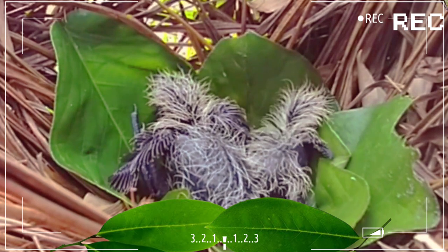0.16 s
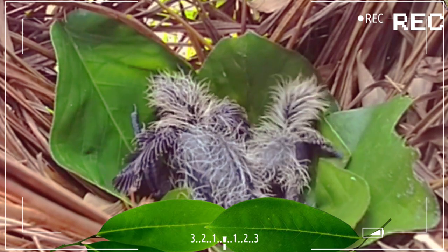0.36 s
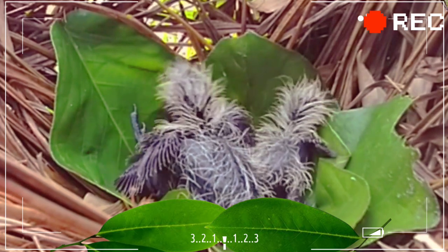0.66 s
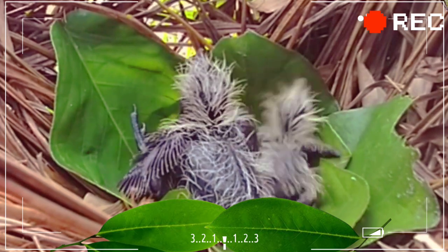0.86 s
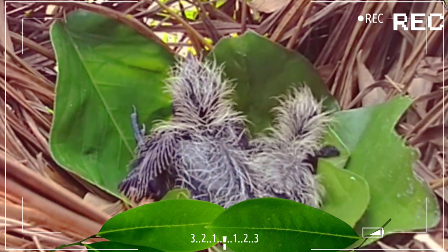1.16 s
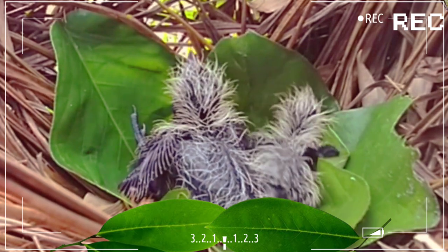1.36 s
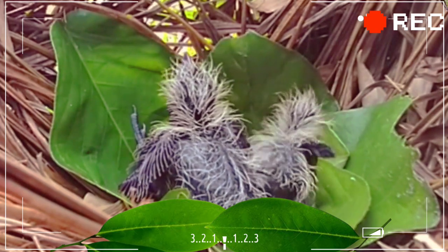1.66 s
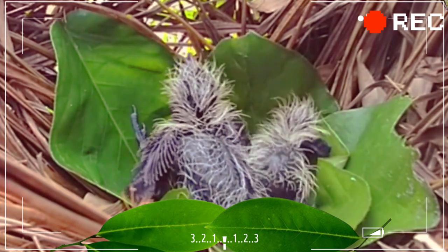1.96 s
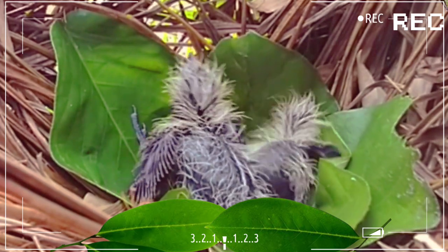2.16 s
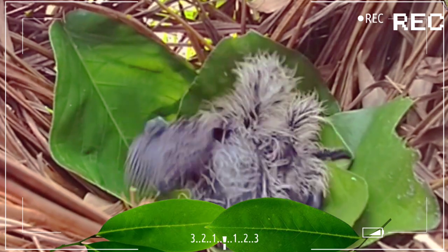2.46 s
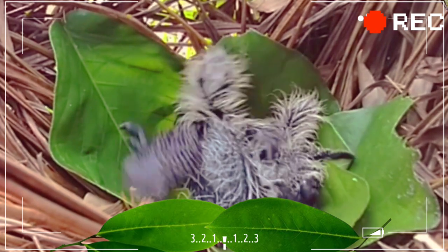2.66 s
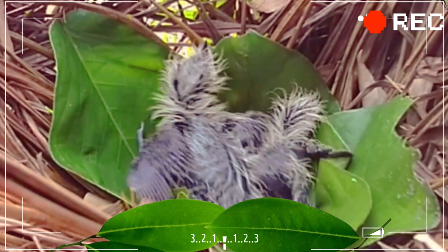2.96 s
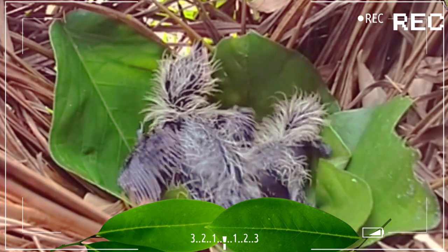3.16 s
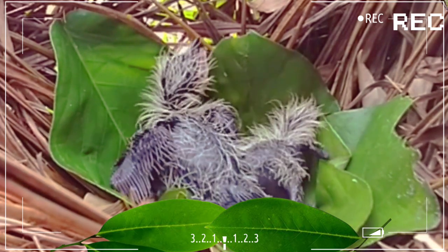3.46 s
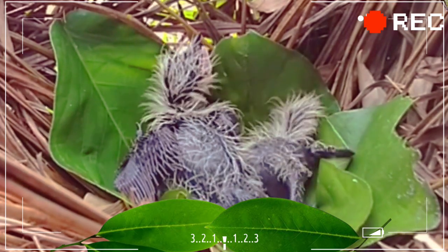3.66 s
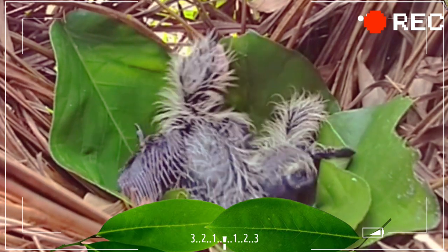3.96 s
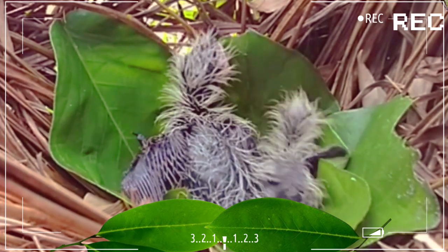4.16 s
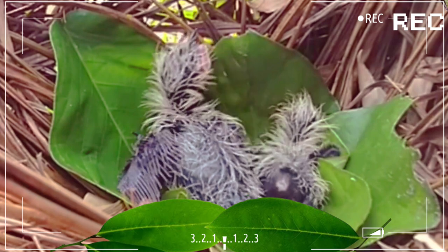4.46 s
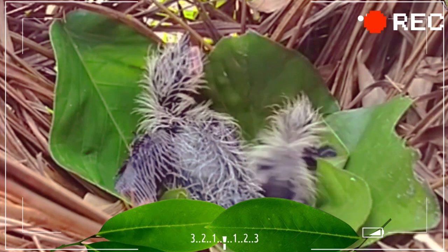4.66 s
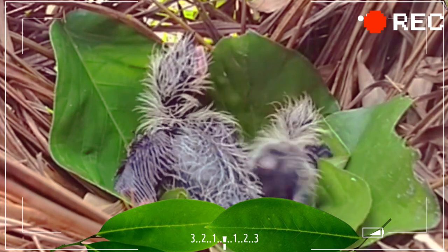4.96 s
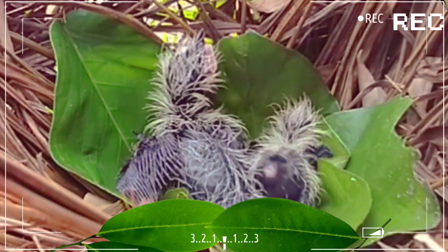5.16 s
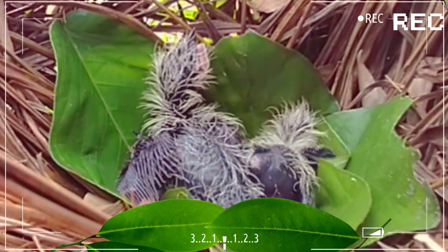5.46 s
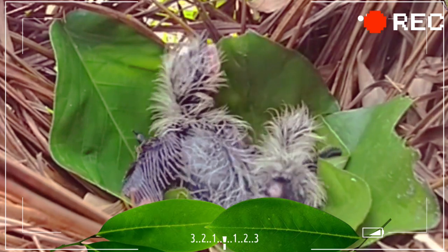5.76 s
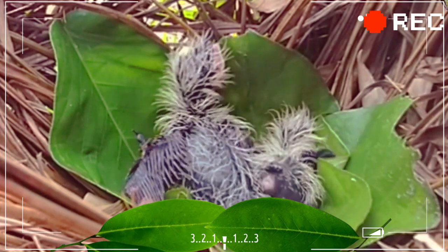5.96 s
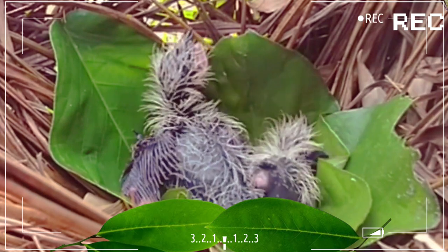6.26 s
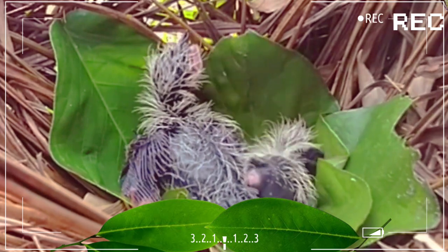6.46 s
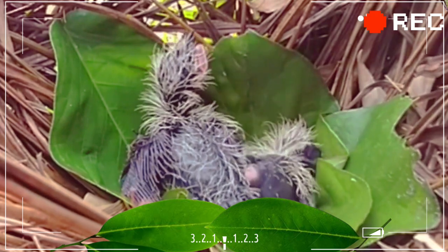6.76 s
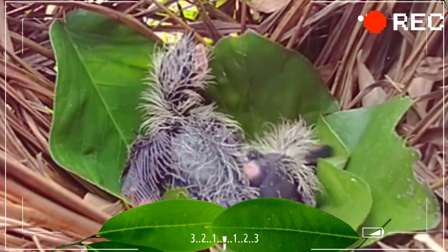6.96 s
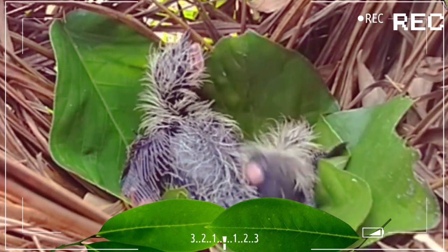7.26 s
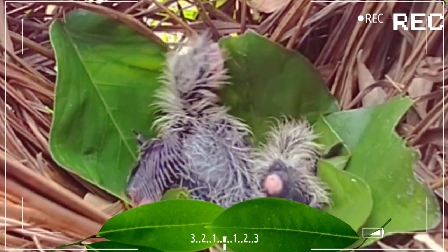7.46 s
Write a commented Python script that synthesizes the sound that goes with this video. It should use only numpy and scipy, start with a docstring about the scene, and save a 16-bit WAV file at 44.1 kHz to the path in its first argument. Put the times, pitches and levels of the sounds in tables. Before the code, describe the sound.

Outdoors, close to a nest among leaves. From 0 to 0.5 s a bird whistles a nearly pure tone around 2 kHz, with a quick warble dipping in pitch. Behind it lie faint airy hiss, low rumble, a thin high insect drone with a few long chirps, and soft gliding notes of far birds. Until 2.7 s it is mostly quiet: light rubbing, high crackle and small dry taps on leaves, busier around 2.2 to 2.6 s. At 2.7 s a soft begging rasp begins, then harsh chopped hisses with a high squeal repeat over four times a second, some followed by tiny falling peeps. A low hum swells around 3 to 5 s. A second warbled whistle sounds from about 4.1 to 4.8 s. After 5.8 s the rasps grow longer, brighter and stronger, with sharp ticks, rubbing and a strong crackle near 6.7 s, continuing to the end at about 7.6 s.

```python
"""Nestlings beg close by in a nest of leaves outdoors: loose flaps chop their breath
into puffs that ring throat and gape, over four rasps a second, with growing effort overall.
A bird whistles two nearly pure tones, each with a warble; some rasps get a breathy peep.
Soft rubbing and a fine high crackle swell, and noise bursts tap the leaves. Behind: insects as
narrow noise, gliding notes of far birds, shaped noise for hiss and rumble, and a wavering low hum."""
import sys
import numpy as np
from scipy import signal
from scipy.fft import rfft, irfft, next_fast_len
from scipy.io import wavfile
from scipy.ndimage import uniform_filter1d, map_coordinates

SR = 44100
rng = np.random.default_rng(int(sys.argv[2]) if len(sys.argv) > 2 else 0)


def file_out(sig):
    """Save sig as 16-bit WAV at sys.argv[1]."""
    # one column per channel
    cols = np.atleast_2d(sig).T
    # limit, then scale
    lim = np.clip(cols, -1, 1)
    pcm = np.round(lim * 32767).astype(np.int16)
    wavfile.write(sys.argv[1], SR, pcm)


N = 336042
TIME, BINS = np.arange(N) / SR, np.fft.rfftfreq(N, 1 / SR)


def amp(db):
    """Decibels to gain."""
    return 10 ** (np.asarray(db) / 20)


def unit(x):
    """Scales to rms 1."""
    return x / np.sqrt(np.mean(x ** 2) + 1e-20)


def follow(rows, t):
    """The columns of a curve at times t."""
    s, *columns = np.transpose(rows)
    return [np.interp(t, s, c) for c in columns]


def add(mix, s, sound):
    """Mixes a sound in at s seconds."""
    part = mix[max(round(s * SR), 0):][:len(sound)]
    part += sound[:len(part)]


def colour(x, points):
    """Weights the spectrum of x by a curve of (f/Hz, level/dB) points, then scales to rms 1."""
    hz, db = np.transpose(points)
    gain = amp(np.interp(np.log(BINS + 1), np.log(hz), db))
    return unit(irfft(rfft(x) * gain, N))


def bell(f, hz, width):
    """Gain of a steep resonance, halved at half its width to either side."""
    return 1 / (1 + (2 * (f - hz) / width) ** 2)


def wander(n, hz):
    """Slow random drift of rms about 1, up to about hz."""
    size = next_fast_len(n + SR // 4)
    f = np.fft.rfftfreq(size, 1 / SR)
    spectrum = rfft(rng.standard_normal(size)) * np.exp(-(f / hz) ** 2)
    return unit(irfft(spectrum, size))[:n]


def resonate(x, hz, width):
    """Rings x with a steep resonance that follows the curve hz, at rms 1."""
    turn = np.exp(2j * np.pi * np.cumsum(hz * np.ones(len(x))) / SR)
    r = np.exp(-np.pi * width / SR)
    # shift the pitch down to zero, filter with a double pole, shift back up
    ringing = signal.lfilter([1], [1, -2 * r, r * r], x / turn)
    return unit((turn * ringing).real)


# the two whistles, one curve each: t/s, f/Hz, level/dB (pitch and level before the warble)
WHISTLES = [
    [(0, 1994, -28), (.05, 1993, -25.5), (.13, 2032, -25), (.27, 2061, -24.5), (.33, 2048, -25),
     (.41, 2025, -27.5), (.48, 2019, -30.5), (.521, 2036, -30)],
    [(4.07, 2035, -45), (4.15, 1986, -35.5), (4.29, 2022, -32.5), (4.41, 2052, -24.5), (4.505, 2107, -26.5),
     (4.56, 2070, -25), (4.65, 2031, -23.5), (4.73, 2011, -25.5), (4.836, 2002, -29)],
]
# the warble in the middle of each whistle: deepest t/s, one dip t/s
WARBLES = [(.195, .177), (4.496, 4.473)]
# partials of the whistle: multiple of the pitch, level/dB, extra level/dB at full strain
PARTIALS = [(1, 0, -2), (2, -48, 0), (3, -33, 13), (4, -38, 5), (5, -40, 14)]


def whistle(tune, deepest_s, dip_s, warble_hz=16.84, depth_hz=152, rise_s=.075, fall_s=.14,
            dip_db_per_100_hz=8.0, lag_s=0.0055, release_s=0.015):
    """A nearly pure tone; each dip of the warble pulls down the pitch and, just after, the level."""
    t = np.arange(tune[0][0], tune[-1][0], 1 / SR)
    hz, level_db = follow(tune, t)
    # the warble builds quickly and dies away slowly
    side_s = np.where(t < deepest_s, rise_s, fall_s)
    depth = depth_hz * np.exp(-((t - deepest_s) / side_s) ** 2)
    dip, weak = (np.cos(np.pi * warble_hz * (t - dip_s - lag)) ** 2 for lag in (0, lag_s))
    pitch = hz - depth * dip ** 2 + 4 * wander(len(t), 63)
    phase = 2 * np.pi * np.cumsum(pitch) / SR
    db = level_db - dip_db_per_100_hz * depth / 100 * weak ** 5 + 1.2 * wander(len(t), 35)
    # the tone brightens as the bird pushes the pitch up
    strain = np.clip((pitch - 2000) / 50, -.5, 1)
    tone = sum(amp(d + extra * strain) * np.sin(round(k) * phase) for k, d, extra in PARTIALS)
    release = np.minimum((t[-1] - t) / release_s, 1)
    return t[0], np.sqrt(2) * amp(db) * tone * release


# far birds, one arched or gliding note each:
# start t/s, length/s, start f/Hz, middle f/Hz, end f/Hz, level/dB (before the flutter)
FAR_CALLS = [(0, 0.15, 640, 554, 500, -60), (0.129, 0.19, 840, 931, 760, -61),
             (0.298, 0.245, 560, 628, 574, -55), (0.515, 0.3, 1480, 2010, 2187, -59),
             (0.828, .5, 600, 619, 555, -62.5), (1.676, 0.16, 978, 1060, 1080, -63.5),
             (1.44, 0.106, 2560, 2420, 2340, -62), (2.5, .08, 2580, 2470, 2310, -58)]


def far_call(start, length, start_hz, middle_hz, end_hz, db, blur_hz=70, blur_db=-7, flutter_db=3.0):
    """A distant note on one arch of pitch, fluttering and blurred by the trees."""
    u = np.linspace(0, 1, int(length * SR))
    arch = np.polyfit([0, .5, 1], [start_hz, middle_hz, end_hz], 2)
    hz = np.polyval(arch, u)
    tone = np.sin(2 * np.pi * np.cumsum(hz) / SR)
    blur = amp(blur_db) * resonate(rng.standard_normal(len(u)), hz, blur_hz)
    level = amp(db + flutter_db * wander(len(u), 30))
    return start, level * (tone + blur) * signal.windows.tukey(len(u), .5)


def crackle(grains_per_s, spread_db, smooth):
    """Small snaps of uneven size over a soft hiss."""
    size = amp(spread_db * np.minimum(rng.exponential(1, N), 4))
    grains = (rng.random(N) < grains_per_s / SR) * size
    return unit(grains * rng.choice([-1, 1], N)) + smooth * rng.standard_normal(N)


# swells of soft rubbing and fine high hissing crackle:
# middle t/s, half length/s, rubbing level/dB (before rub_trim_db), crackle level/dB
SWELLS = [(0.054, 0.13, -58.5, -46.5), (0.252, 0.071, -54.5, -36.5), (.48, .08, -57, -45),
          (0.98, 0.069, -56.5, -52), (1.207, 0.043, -61, -55), (2.14, 0.11, -56, -48),
          (2.396, 0.083, -47.5, -43), (2.738, 0.16, -49.5, -51), (3.603, 0.69, -54.5, -44),
          (5.3, 0.66, -56.5, -49), (6.3, 0.38, -48, -51), (6.67, 0.34, -40.5, -21),
          (7.2, 0.073, -42.5, -45), (7.58, 0.31, -43.5, -33)]
# tone of the soft rubbing: f/Hz, relative level/dB
RUB_COLOUR = [(60, -7), (150, 1.5), (400, 2.5), (750, 8), (1200, 6.5), (2300, 5.5), (3500, 0), (5000, -4),
              (6200, 6), (7500, -17), (9500, 1.5), (12200, -9)]
# tone of the fine high crackle: f/Hz, relative level/dB
FIZZ_COLOUR = [(4000, -65), (8000, -13.5), (10000, -17.5), (11500, -3), (12300, -7)]
# tone of the dull bumps: f/Hz, relative level/dB
BUMPS = [(30, -21), (80, -4.5), (140, -7), (280, -14.5), (500, -2), (1500, -50)]


def rub_and_fizz(resting_rub_db=-64.5, resting_fizz_db=-58, rub_trim_db=3, bump_db=-61):
    """Soft rubbing and a fine high hissing crackle swell together; strong rubbing adds dull bumps."""
    middle, half, rubs, fizzes = np.transpose(SWELLS)
    swelling = np.exp(-((TIME - middle[:, None]) / half[:, None]) ** 2)
    # overlapping swells add up as power
    force = np.sqrt(amp(resting_rub_db) ** 2 + amp(rubs) ** 2 @ swelling)
    rub = force * colour(crackle(1500, spread_db=3.0, smooth=0.76), RUB_COLOUR)
    fizz_level = np.sqrt(amp(resting_fizz_db) ** 2 + amp(fizzes) ** 2 @ swelling)
    fizz = fizz_level * colour(crackle(1300, spread_db=6.0, smooth=0.55), FIZZ_COLOUR)
    bumps = unit(force ** 2 * colour(crackle(40, spread_db=6, smooth=0.18), BUMPS))
    return amp(rub_trim_db) * rub + fizz + amp(bump_db) * bumps


# long pulses of one insect: start t/s, end t/s
CHIRPS = [(.28, .59), (.98, 1.23), (1.68, 1.98)]


def insects(drone_hz=6760, drone_width_hz=300, drone_db=-61,
            chirp_hz=9500, chirp_width_hz=280, chirp_db=-63):
    """Narrow bands of noise: one insect drones steadily, another chirps in long pulses."""
    pulses = sum(1. * ((TIME > a) & (TIME < b)) for a, b in CHIRPS)
    gate = uniform_filter1d(pulses, SR // 20)
    drone = resonate(rng.standard_normal(N), drone_hz, drone_width_hz)
    chirp = gate * resonate(rng.standard_normal(N), chirp_hz, chirp_width_hz)
    return amp(drone_db) * drone + amp(chirp_db) * chirp


# tone of the outdoor hiss: f/Hz, relative level/dB
AIR = [(59, -41), (100, 3), (206, 0.5), (263, 4), (335, -4), (521, 2.5), (916, -7), (2460, -11),
       (4410, -30), (5960, -34.5), (6590, -47), (7590, -30), (12300, 5.5), (16000, -24), (22000, -120)]
# swell of the low rumble: t/s, level/dB
RUMBLE = [(0, -48.5), (1.3, -56), (2.5, -51), (5.5, -50.5), (7, -48.5), (7.62, -47)]
# tone of the rumble: f/Hz, relative level/dB
RUMBLE_COLOUR = [(10, -0.5), (25, 6.5), (35, -7.5), (44, -1.5), (55, -2), (70, -4.5), (110, -13),
                 (200, -30), (500, -63)]
# swell of the low hum: t/s, level/dB (before hum_trim_db)
HUM = [(0, -67), (2.3, -65.5), (3.0, -52.5), (3.4, -47.5), (4.6, -47), (5.4, -52), (7.62, -52)]


def air(hiss_db=-53, hum_hz=44, hum_trim_db=-1):
    """Faint outdoor hiss and a low rumble of shaped noise, with a hum wavering in pitch and level."""
    rumble = amp(follow(RUMBLE, TIME)[0]) * colour(rng.standard_normal(N), RUMBLE_COLOUR)
    turns = np.cumsum(hum_hz + 2.7 * wander(N, 7.6)) / SR
    hum_db = follow(HUM, TIME)[0] + hum_trim_db + 1.1 * wander(N, 5.8)
    hum = amp(hum_db) * np.sqrt(2) * np.sin(2 * np.pi * turns)
    return hum + rumble + amp(hiss_db) * colour(rng.standard_normal(N), AIR)


# claws and wings tapping leaves:
# t/s, tick level/dB, knock level/dB (both before the trims), leaf pitch f/Hz
TAPS = [(0.171, -23.5, -32.5, 1400), (0.292, -29, -35, 1700), (0.411, -58, -35, 1400),
        (1.001, -45, -37, 1200), (1.099, -46, -40.5, 850), (1.113, -37, -52, 700), (1.334, -46, -35.5, 795),
        (1.452, -45, -39, 1310), (1.976, -30, -46, 900), (2.039, -31, -36, 2290),
        (2.181, -23.5, -23.5, 456), (2.273, -27.5, -55, 900), (2.437, -27, -21, 540),
        (2.574, -16, -35, 700), (2.595, -42, -32, 900), (2.611, -26, -24, 860), (4.084, -19, -43, 900),
        (4.17, -3.5, -35, 700), (4.995, -33, -48, 900), (6.189, -29, -49, 700), (6.205, -8.5, -31, 704),
        (6.387, -3.5, -47, 500), (6.455, -5, -43, 600), (6.55, -28, -29, 220), (6.686, -8, -42, 300),
        (6.858, -20, -31, 600), (6.881, -3.5, -30, 500), (6.887, -8, -32, 700), (7.18, -26, -24.5, 220),
        (7.363, -7, -27.5, 1500), (7.376, -10, -42, 900)]


def tap(s, tick_db, knock_db, hz, tick_s=0.0039, knock_s=0.0065, after_db=-20, after_s=0.017,
        tick_trim_db=-3, knock_trim_db=-6, width_per_hz=2.1,
        crack_hz=3600, crack_width_hz=5000, crack_s=0.003, crack_trim_db=-11.0):
    """A dry tick with a little crackle after it, and a short dull knock of the leaf with its crack."""
    t = np.arange(SR // 12) / SR
    snap = unit(signal.lfilter([1, -1.2, .45], [1], rng.standard_normal(len(t))))
    tick = snap * (np.exp(-t / tick_s) + amp(after_db) * np.exp(-t / after_s))
    knock = resonate(rng.standard_normal(len(t)), hz, width_per_hz * hz) * np.exp(-t / knock_s)
    crack = resonate(rng.standard_normal(len(t)), crack_hz, crack_width_hz) * np.exp(-t / crack_s)
    hit = amp(knock_trim_db) * knock + amp(crack_trim_db) * crack
    return s, amp(tick_db + tick_trim_db) * tick + amp(knock_db) * hit


def rattle(t, rate_hz=310, jitter=.2, puff_s=0.00017, hiss=0.6, uneven_db=3.0):
    """Air chopped into uneven puffs by a loosely flapping syrinx."""
    turns = np.cumsum(rate_hz * np.exp(jitter * wander(len(t), 120))) / SR
    flaps = np.diff(np.floor(turns), prepend=0) * amp(uneven_db * rng.standard_normal(len(t)))
    puffs = signal.lfilter([1], [1, -np.exp(-1 / (puff_s * SR))], flaps)
    return (hiss + puffs) * rng.standard_normal(len(t))


# surfaces some 0.2 to 1 m away throw the rasps back: delay/ms, signed gain
SURFACE_ECHOES = [(1.285, -0.053), (2.06, 0.102), (2.38, 0.074), (3.155, -0.115), (3.32, -0.06),
                  (3.47, -0.091), (3.625, -0.077), (4.365, -0.074), (4.685, -0.072), (5.53, 0.055)]


def near_echoes(f, count=14):
    """Near echoes comb the spectrum: some stay put, others shift as the chick moves its head."""
    shifting = np.c_[rng.uniform(.6, 11, count), .075 * rng.choice([-1, 1], count)]
    delay_ms, gain = np.vstack([SURFACE_ECHOES, shifting]).T
    return 1 + gain @ np.exp(-2j * np.pi * delay_ms[:, None] * f / 1000)


# begging rasps: start t/s, length/s, attack/s, effort level/dB, then relative to the effort:
# low body level/dB, treble level/dB, squeal level/dB; extra fade of the squeal/(dB/s), squeal f/Hz
RASPS = [(2.727, 0.24, 0.17, -38, -3, -6, -9, 170, 11000),
         (2.99, 0.19, 0.045, -25.5, -12.5, -4.5, -9, 190, 10630),
         (3.206, 0.2, 0.059, -25.5, -10, -9, -4, 300, 10610),
         (3.428, 0.19, 0.051, -21, -13, -8, -0.5, 430, 10560),
         (3.656, 0.2, .056, -20, -14, -10, -1.5, 230, 10300),
         (3.873, .2, 0.053, -22, -13.5, -6, -2, 298, 10300),
         (4.088, 0.2, 0.051, -21, -14.5, -6.5, -5.5, 250, 10660),
         (4.311, .2, .049, -20, -15, -9, 0, 290, 10200), (4.535, 0.2, 0.054, -21.5, -13, -7, 2, 370, 10300),
         (4.768, 0.19, 0.056, -21, -14.5, -7.5, -1, 280, 10200),
         (4.992, .187, 0.047, -20, -16, -6, -5, 290, 9940),
         (5.236, 0.18, 0.054, -22, -15, -3, -12, 170, 11000),
         (5.466, .188, 0.053, -23.5, -14, -4.5, -1.5, 48, 10160),
         (5.783, 0.23, 0.046, -20, -16.5, -2, -6.5, 30, 10760),
         (6.002, .243, 0.071, -18, -17.5, -5.5, -4.5, 0, 10260),
         (6.224, 0.3, 0.051, -19, -16, -4.5, 0, 9, 10200),
         (6.448, .29, 0.065, -17, -15, -1.5, -2.5, -2, 10200),
         (6.669, 0.27, 0.053, -17, -18, -3, -1, 30, 10070),
         (6.881, 0.24, 0.076, -17, -16, -2.5, -4, 12, 10180),
         (7.125, 0.23, 0.056, -17, -17, -3, -2, 3, 10190),
         (7.365, 0.24, 0.072, -18.5, -17, -3, -3, 62, 10080),
         (7.567, 0.21, 0.074, -18, -21.5, -4, -6, 32, 10700)]
# resonances of throat and gape: f/Hz, width/Hz,
# relative level/dB with the beak barely open, half open, wide open (before chance variation)
THROAT = [(581, 300, -20, -21.5, -23.5), (720, 2700, -37, -37, -33), (1325, 830, -17, -18.5, -18.5),
          (1903, 730, -15, -17.5, -14.5), (2977, 600, -13, -15.5, -17.5), (3250, 840, -9, -31, -21.5),
          (4203, 660, -8, -10, -12), (5060, 840, -2, -13, -11.5), (5670, 100, -2, -3.5, -13),
          (5900, 270, -3.5, -1.5, -2), (6305, 720, -0.5, -7, -2), (6550, 520, -6.5, -8.5, -32),
          (7400, 1400, -13, -11.5, -14.5), (7850, 230, -28, -10, -9.5), (8320, 1400, -8, -10, -15.5),
          (9040, 620, -21, -14.0, -10.5), (10000, 780, -15.5, -13.5, -12), (11250, 220, -21, -16, -6),
          (11960, 860, -10, -11, -5)]
# how wide the beak opens over time: t/s, gape (0 barely, 1 half, 2 wide open)
GAPE = [(4.2, 0), (5.0, 1.44), (5.7, 0.48), (6.05, 1.8)]


def rasp(start, length, attack_s, effort_db, body_db, treble_db, squeal_db, squeal_fade, squeal_hz,
         vary_db=1.55, sag=0.0062, squeal_width_hz=750, onset_share=0.06, onset_s=0.0056,
         swell_power=1.46, body_swell_power=0.68, release_s=0.087, release_power=0.84,
         fade_db_per_s=96, body_fade_db_per_s=31, treble_fade_db_per_s=147):
    """The rattle rings the throat, which varies a little each time and sags as the call fades."""
    t = np.arange(0, length, 1 / SR)
    hz, width, *shapes = np.transpose(THROAT)
    gape = np.clip(follow(GAPE, start)[0], 0, 2)
    # blend the two nearest beak openings
    shape_db = sum(max(1 - abs(gape - k), 0) * db for k, db in enumerate(shapes))
    gains = amp(shape_db + vary_db * rng.standard_normal(len(hz)))
    f = np.fft.rfftfreq(len(t), 1 / SR)
    echoes = near_echoes(f)
    throat = np.sqrt(gains ** 2 @ bell(f, hz[:, None], width[:, None]) ** 2)
    voiced = rfft(rattle(t)) * echoes * throat
    # reading ever slower makes the resonances sag
    place = np.cumsum(1 + sag * np.linspace(1, -1, len(t)))
    bands = [f < 2400, (f >= 2400) & (f < 7100), f >= 7100]
    registers = (irfft(voiced * band, len(t)) for band in bands)
    low, mid, high = (unit(map_coordinates(x, [place], order=5, mode="mirror")) for x in registers)
    # the squeal is the resonance of the open beak
    beak = resonate(irfft(rfft(rattle(t)) * echoes, len(t)), squeal_hz, squeal_width_hz)
    # abrupt start at a share of the strength, then swell, then closing off
    lift = np.sin(np.pi / 2 * np.minimum(t / attack_s, 1)) ** swell_power
    rise = onset_share + (1 - onset_share) * lift
    release = np.clip((length - t) / release_s, 0, 1) ** release_power
    swell = np.minimum(t / onset_s, 1) * rise * release
    # each register fades at its own pace as the air runs out, the low body slowest
    fading_s = np.maximum(t - attack_s, 0)
    sound = (swell ** body_swell_power * amp(body_db - body_fade_db_per_s * fading_s) * low
             + swell * amp(-fade_db_per_s * fading_s) * mid
             + swell * amp(treble_db - treble_fade_db_per_s * fading_s) * high
             + swell * amp(squeal_db - (fade_db_per_s + squeal_fade) * fading_s) * beak)
    return start, amp(effort_db) * sound


# small peeps around the ends of some rasps:
# t/s (a quarter of the way into the note), level/dB (before trim_db), middle f/Hz
PEEPS = [(3.1576, -46, 1360), (3.5972, -41, 1370), (3.8274, -43, 1370), (4.041, -46, 1300),
         (4.2612, -47, 1370), (4.9397, -45, 1390), (5.1577, -51, 1380), (5.3951, -47, 1410),
         (5.62, -49, 1360)]


def peep(s, db, hz, length_s=0.024, fall=0.12, width_hz=70, trim_db=-2):
    """A short, breathy, falling note: noise through a narrow gliding resonance."""
    u = np.linspace(-1, 1, int(length_s * SR))
    note = resonate(rng.standard_normal(len(u)), hz * (1 - fall * u), width_hz)
    return s - length_s / 4, amp(db + trim_db) * (1 - u ** 2) * note


def foliage(x, t60=0.14, wet_db=-24):
    """Weak scattered echoes from the plants around."""
    t = np.arange(SR // 2) / SR
    sparse = (rng.random(len(t)) < .05) * (t > .006)
    echoes = rng.standard_normal(len(t)) * sparse * amp(-60 * t / t60)
    return x + amp(wet_db) * signal.oaconvolve(x, echoes / np.linalg.norm(echoes))[:N]


def scene():
    """The birds, rubbing and taps among the plants, over the background."""
    near, bird = np.zeros(N), np.zeros(N)
    for tune, warble in zip(WHISTLES, WARBLES):
        add(bird, *whistle(tune, *warble))
    far = insects() + air()
    for row in FAR_CALLS:
        add(far, *far_call(*row))
    for row in TAPS:
        add(near, *tap(*row))
    for row in RASPS:
        add(near, *rasp(*row))
    for row in PEEPS:
        add(near, *peep(*row))
    return (foliage(near + rub_and_fizz()) + foliage(bird, t60=0.5, wet_db=-21.0) + far)[None]


def record(dry, edge_hz=12430, ceiling=.52):
    """The recorder limits the band and rounds off the tallest peaks."""
    lowpass = signal.firwin(801, edge_hz, window=("kaiser", 8), fs=SR)[None]
    x = signal.oaconvolve(dry, lowpass, "same")
    rounded = x / (1 + (x / ceiling) ** 8) ** (1 / 8)
    return signal.oaconvolve(rounded, lowpass, "same")


dry = scene()
out = record(dry)
file_out(out)
```